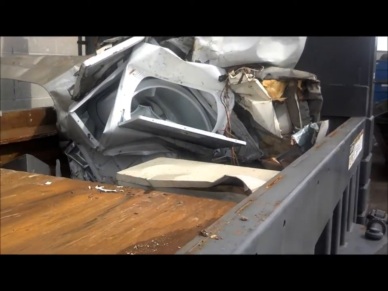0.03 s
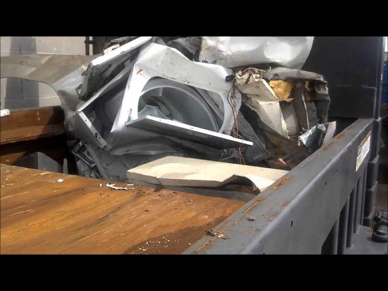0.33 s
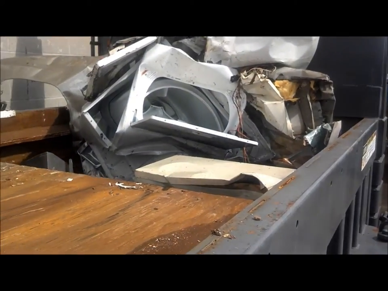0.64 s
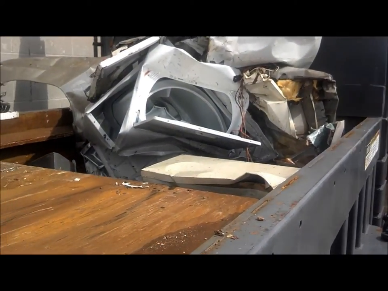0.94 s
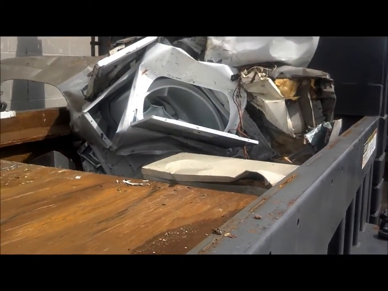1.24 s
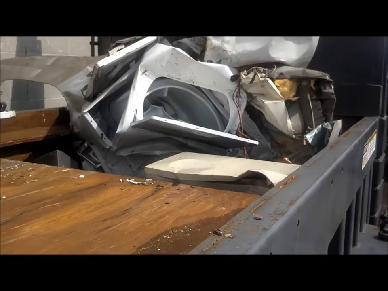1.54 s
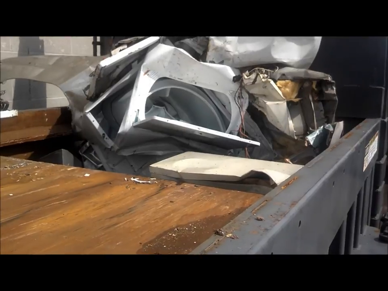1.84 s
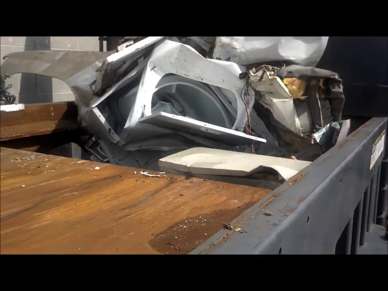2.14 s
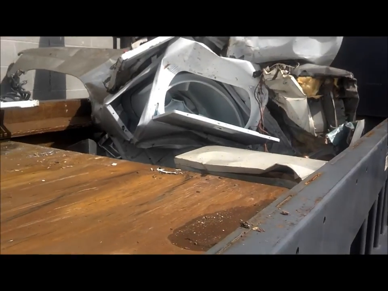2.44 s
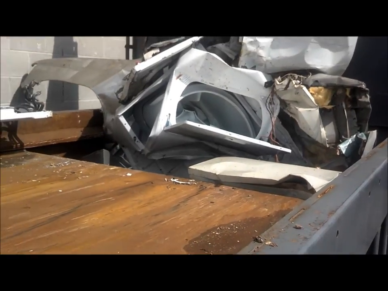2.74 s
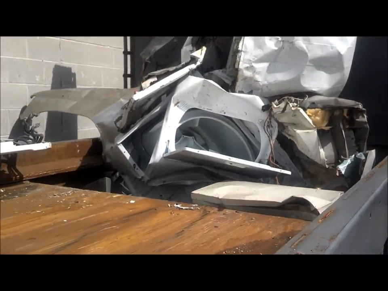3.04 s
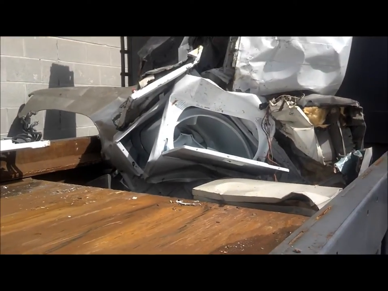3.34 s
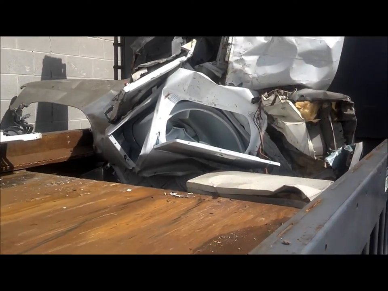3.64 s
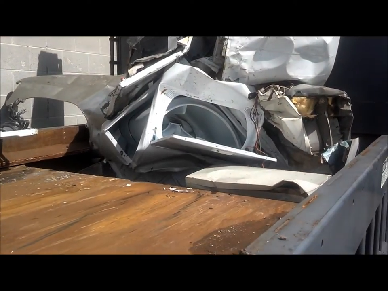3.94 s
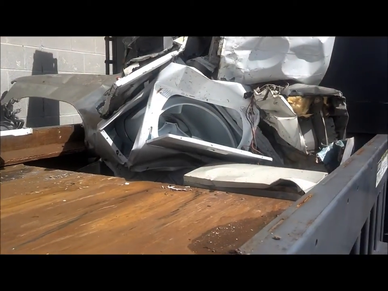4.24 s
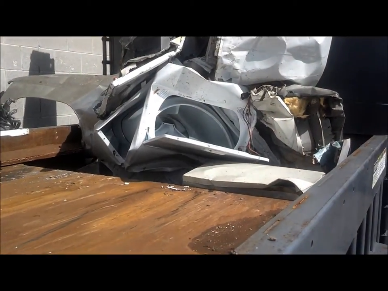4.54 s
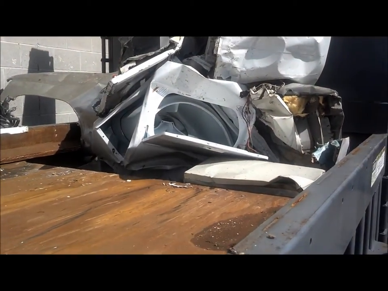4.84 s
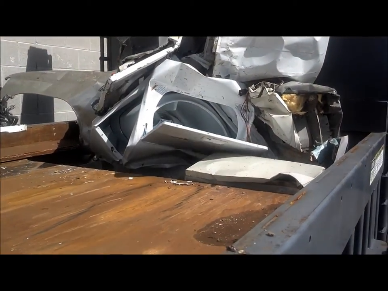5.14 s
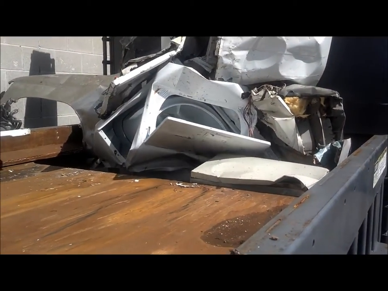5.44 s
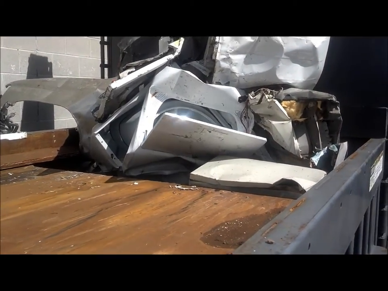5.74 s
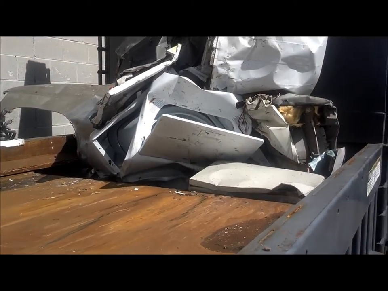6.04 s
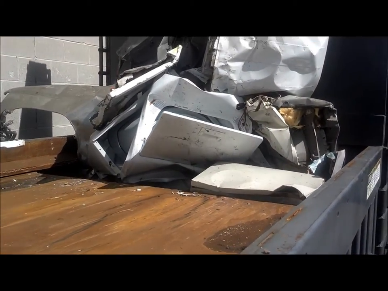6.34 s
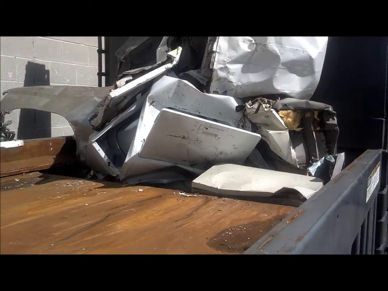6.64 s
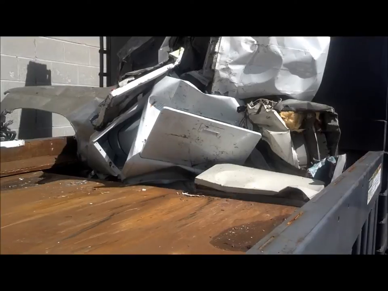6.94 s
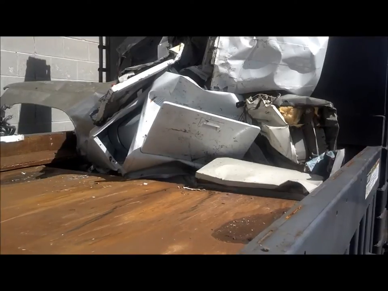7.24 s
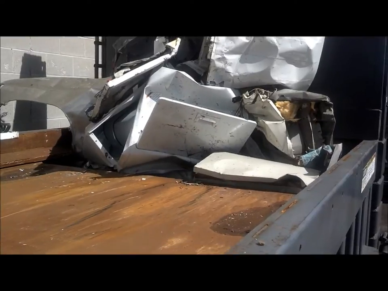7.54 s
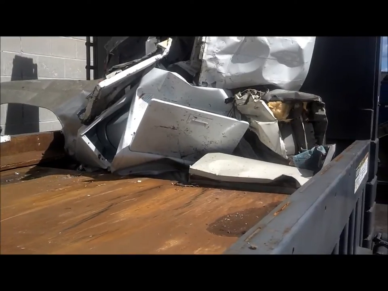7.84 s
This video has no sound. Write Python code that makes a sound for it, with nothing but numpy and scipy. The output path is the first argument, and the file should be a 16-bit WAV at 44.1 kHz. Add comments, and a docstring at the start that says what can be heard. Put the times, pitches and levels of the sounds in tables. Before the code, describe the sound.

A scrap compactor's diesel engine drones steadily, its hydraulic pump hissing and whining, as it crushes appliances in a walled yard. Metal creaks, a panel crunches, and the ram squeals along the steel floor. Crunches, sharp snaps and hollow knocks then crowd together, and a washing machine door groans as it folds. Heard from a few metres away, with short echoes.

```python
"""A hydraulic scrap compactor crushes appliances in a walled yard. From the start the diesel drones,
the pump hisses and whines, and the heap creaks. A sheet drags, a first panel crunches and snaps, and
the ram squeals along the steel floor. From 2 s panels pop with hollow knocks and the crunches crowd
in; from 5.6 s a washer's door groans as it folds. Two close microphone ports, a few metres off,
hear it all, and a limiter ducks the machine after each loud crunch."""
import sys
import numpy as np
from scipy import signal
from scipy.fft import rfft, irfft, next_fast_len
from scipy.io import wavfile
from scipy.ndimage import uniform_filter1d

SR = 44100
rng = np.random.default_rng(int(sys.argv[2]) if len(sys.argv) > 2 else 0)


def transcribe(signal):
    """Save signal, clipped to [-1, 1], as a 16-bit WAV file at the path in sys.argv[1]."""
    frames = np.atleast_2d(signal).T
    limited = np.clip(frames, -1, 1)
    pcm = np.round(limited * 32767).astype(np.int16)
    wavfile.write(sys.argv[1], SR, pcm)


N = 351918
T = np.arange(N) / SR

# Levels are relative: each voice adds its own trim.
# the shaft, slowing a touch under load: t/s, speed/(turns per s)
SHAFT_SPEED = [(0, 29.906), (2.5, 29.904), (3.2, 29.895), (6.4, 29.895), (7.98, 29.875)]
# drone and hiss levels, rising and falling over time: # t/s, drone level/dB, hiss level/dB
MACHINE_LEVELS = [(0, -25, -31.5), (0.25, -27, -30.5), (0.55, -25.5, -30), (0.61, -25, -34),
                  (1.0, -26, -29.5), (1.5, -28.5, -32), (2.6, -27, -34.5), (3.1, -25.5, -32.5),
                  (3.3, -27, -32), (3.5, -25, -31), (4.0, -30, -35), (4.5, -28.5, -33.5), (5.2, -30, -34),
                  (5.35, -31, -38.5), (6.2, -30.5, -34), (6.8, -27, -36), (7.1, -29.5, -35.5),
                  (7.7, -29, -34.5), (7.8, -37, -40.5), (7.98, -36, -36)]
# tone colour of the diesel: f/Hz, level/dB
DIESEL_SPECTRUM = [(30, -26), (70, -14), (110, -4), (170, 0), (240, 3.5), (340, 3), (450, -2), (600, 2),
                   (1020, -9.5), (1200, -6), (1450, -9.5), (1900, -11), (2600, -9), (5000, -34),
                   (16000, -17.5)]
# tone colour of rushing oil: f/Hz, level/dB
OIL_SPECTRUM = [(1000, -13), (2600, -27), (4000, 3), (5000, 6), (6300, 1), (8000, -6), (10000, 2),
                (13000, 6.5), (15500, 4.5)]
# the pump's whine: multiple of the vane rate, level/dB
PUMP_HARMONICS = [(1, -34), (2, -40), (5, -46), (8, -44), (9, -56), (10, -48), (11, -55), (12, -50),
                  (14, -59), (16, -52), (19, -59), (24, -57), (30, -50), (33, -46), (34, -48), (35, -51),
                  (36, -48.5), (37, -49), (38, -54), (39, -45), (40, -52), (41, -45.5), (42, -49),
                  (43, -52)]
# the heap's creaking bed: t/s, level/dB
CREAK_LEVELS = [(0, -32.5), (3.3, -29), (3.48, -32.5), (4.0, -36.5), (5.5, -29), (6.6, -42), (7.12, -53),
                (7.7, -29.5), (7.8, -45), (7.98, -44)]
# tone colour of crumpling sheet: f/Hz, level/dB
SCRAP_SPECTRUM = [(30, -77), (70, -27.5), (110, -12.5), (170, -2.5), (300, -5), (450, -4), (900, -1),
                  (1400, -1.5), (2000, -3), (2600, -5.5), (4000, -8), (5000, -8), (6300, -15),
                  (9000, -18.5), (15500, -9)]
# modes of the washer's casing: f/Hz, level/dB, t60/s
CASING_MODES = [(611, 4, 0.067), (889, 3, 0.17), (1144, 2.5, 0.22), (1274, 3, 0.2), (1380, 4.5, 0.17),
                (1790, 2, 0.17), (2006, 2.5, 0.13), (2402, 6.5, 0.16)]
# sheets dragging under the ram: t/s, hold/s, level/dB, bass/dB, treble/dB, gain of the casing's ring
SHEET_DRAGS = [(0.268, 0.43, -29, -12, 1, 0.9), (1.103, 0.26, -28, 9, -2, 0.23),
               (1.885, 0.48, -16.5, 3, -7.5, 0.52), (3.621, 0.26, -20, 6.5, -5, 0.28),
               (4.401, 0.38, -25.5, 6, -9, 0.16), (5.3, 0.15, -19, -8.5, -8.5, 0.43),
               (5.384, 0.11, -17, 1.5, -8, 0.23), (5.539, 0.12, -26.5, 8.5, -15, 0.54),
               (5.691, 0.1, -22, 0.5, -6, 0.48), (5.832, 0.1, -16.5, -6, -1.5, 1),
               (6.008, 0.018, -16.5, -8, -3.5, 1.4), (6.435, 0.043, -29, -2.5, -10, 0.21),
               (7.216, 0.35, -23, 0.5, -3.5, 0.42)]
# panels giving way: t/s, level/dB, bass/dB, treble/dB, collapse time/s
COLLAPSES = [(0.557, -14.5, -4, -6, 0.093), (1.582, -16.5, 4, -6.5, 0.0097), (1.638, -19, 6, -19, 0.022),
             (2.109, -17, 1, -13, 0.023), (2.315, -17, -3, -10, 0.013), (2.615, -8.5, -3, -9, 0.037),
             (3.111, -1.5, -1, -9, 0.021), (3.396, -23, -10, 6, 0.012), (3.452, -22.5, -4, -5, 0.016),
             (3.511, -21, 2, 2.5, 0.0069), (3.555, -13, -1.5, -11, 0.016), (3.575, -12, -4, -8.5, 0.022),
             (3.676, -13.5, 1, -15, 0.0074), (3.687, -5.5, -5.5, -16, 0.0036),
             (3.738, -7, -6.5, -12.5, 0.027), (3.814, -10, -7, -10.5, 0.026), (3.869, -9, 0, -5, 0.017),
             (4.064, -16.5, -1.5, -5, 0.04), (4.193, -12.5, 1, -6, 0.014), (4.301, -14, -15, -14, 0.0066),
             (4.36, -12.5, 0.5, -5.5, 0.032), (4.475, -13.5, -7, -15, 0.012),
             (4.525, -13.5, -11, -13, 0.013), (4.612, -17, 2, -9, 0.031), (4.64, -20, 8, -5, 0.021),
             (4.803, -21.5, 1, -1, 0.0098), (4.938, -23, 5.5, -3.5, 0.03), (4.962, -28, 12.5, -8, 0.034),
             (5.012, -19, 5, -11.5, 0.015), (5.127, -19, 1.5, -5.5, 0.0061), (5.149, -23.5, 1, -7, 0.0018),
             (5.258, -10.5, -2, -7, 0.0084), (5.515, -21.5, 5.5, 6, 0.0045), (5.754, -25, -14, 0.5, 0.0034),
             (5.794, -15, 0, -4.5, 0.008), (5.831, -12.5, -4.5, -4, 0.0064), (5.92, -17, -21, -1, 0.023),
             (6.056, -15, -9, 0, 0.008), (6.35, -21.5, -13, -5, 0.015), (6.486, -20, -8, -1.5, 0.0028),
             (6.553, -6.5, 1.5, -1, 0.0082), (6.666, -13.5, 2.5, 0.5, 0.02), (6.755, -17.5, -1, -6, 0.017),
             (6.822, -13, -3, -9, 0.013), (6.855, -22.5, -4, 5.5, 0.021), (6.934, -11.5, 1.5, -1.5, 0.029),
             (7.152, -12, -2, -3.5, 0.014), (7.298, -15.5, 0, -4.5, 0.013), (7.434, -17, 0, -15, 0.0062),
             (7.484, -16, 4.5, -3.5, 0.037), (7.686, -25.5, 6, 3, 0.014), (7.737, -13, -11, -6, 0.0035),
             (7.854, -24.5, -5, -18, 0.0016), (7.95, -34, -6, 0, 0.016)]
# the bright edge of cracking metal: f/Hz, level/dB
CRACK_SPECTRUM = [(1200, -37), (3500, -12), (7000, 4), (15000, -4)]
# folds cracking: t/s, level/dB, ring f/Hz, edge against click/dB
FOLD_SNAPS = [(0.585, -8, 1307, -28), (2.232, -9, 1150, -31), (2.62, 0, 1264, -31), (2.631, -3, 1280, -30),
              (3.13, -5, 1290, -33), (3.556, -7, 1180, -28), (3.742, -6, 1400, -28),
              (3.871, -5.5, 1510, -16), (4.302, -11.5, 1960, -31), (4.385, -8, 1102, -29),
              (4.477, -7.5, 1610, -33), (4.537, -10, 1300, -30), (4.65, -11, 1240, -22),
              (5.133, -15, 1314, -26), (5.26, -7.5, 725, -20), (5.806, -7.5, 1154, -26),
              (6.361, -10, 1062, -14), (6.489, -9.5, 1300, -26), (6.554, -2, 1450, -10),
              (6.559, -5, 1310, -13), (6.958, -4, 1280, -29), (6.98, -12, 1140, -28),
              (7.308, -6.5, 1530, -26), (7.442, -12, 1380, -28), (7.495, -16, 1350, -8),
              (7.75, -2.5, 1264, -28)]
# modes of a narrow strip of sheet: multiple of its pitch, level/dB
STRIP_MODES = [(0.64, -3), (1, 2), (1.19, -17), (1.47, -8), (1.73, -4), (2.9, -16)]
# steel sliding on steel: octave overtone/dB, roughness 0-1, curve of (t/s, f/Hz, level/dB)
RAM_SQUEALS = [(-28.5, 0.7, [(0.69, 997, -38), (0.75, 951, -32), (0.87, 927, -39), (0.98, 850, -39)]),
               (-18, 0.049, [(0.98, 829, -33), (1.015, 793, -22.5), (1.03, 797, -15.5), (1.05, 794, -20),
               (1.095, 792, -14), (1.134, 784, -11), (1.156, 784.5, -14), (1.25, 779, -12.5),
               (1.306, 778, -18.5), (1.366, 783.5, -12.5), (1.428, 791.6, -15), (1.458, 785.4, -13),
               (1.5, 795, -19), (1.534, 792, -13.5), (1.72, 796, -19), (1.848, 799, -19),
               (1.865, 819, -24.5)]), (-28, 0.96, [(1.865, 815, -31), (1.91, 808, -20.5),
               (1.99, 815, -28.5), (2.09, 818, -31), (2.14, 814, -24), (2.24, 826, -25.5),
               (2.28, 827, -28)]), (-26, 0.47, [(1.92, 750, -32), (2.02, 741, -27), (2.14, 737, -35),
               (2.17, 735, -38)]), (-19, 0.31, [(2.5, 796, -24.5), (2.54, 753, -29), (2.555, 745, -20),
               (2.58, 732, -15.5), (2.605, 726, -22.5), (2.66, 727, -21), (2.715, 744, -12.5),
               (2.735, 804, -24.5), (2.815, 811, -14.5), (2.83, 829, -42)]), (-21, 0.14, [(2.845, 823, -30),
               (2.862, 814, -15.5), (2.96, 814, -17.5), (3.08, 811, -14.5), (3.11, 812, -15),
               (3.16, 813, -23), (3.252, 816, -13), (3.272, 810, -39), (3.286, 817, -19), (3.354, 808, -23),
               (3.38, 820, -32)])]
# large panels popping through: t/s, f/Hz, level/dB, t60/s
PANEL_POPS = [(1.92, 135, -28, 0.42), (2.11, 522, -17, 0.17), (2.2, 276.7, -20.5, 0.3),
              (2.616, 1058, -14, 0.22), (2.655, 114.7, -23, 0.3), (2.83, 150, -28, 0.25),
              (3.682, 288, -13.5, 0.17), (3.69, 140, -20, 0.23), (3.872, 268, -11, 0.14),
              (4.204, 221, -19, 0.13), (4.389, 155, -24, 0.14), (4.635, 541, -20.5, 0.16),
              (4.645, 286.6, -24, 0.31), (4.669, 116, -23, 0.17), (4.958, 587, -19, 0.13),
              (4.993, 115, -28, 0.17), (5.046, 109.5, -29, 0.22), (5.131, 609, -13.5, 0.047),
              (5.259, 320, -12, 0.11), (5.385, 328, -18.5, 0.19), (6.361, 521, -21.5, 0.12),
              (6.68, 159.5, -19, 0.17), (6.955, 174, -17, 0.13), (7.159, 175, -26, 0.13),
              (7.497, 241.4, -20, 0.52), (7.53, 537, -20.5, 0.34), (7.648, 669, -18.5, 0.082),
              (7.747, 492, -16.5, 0.088)]
# modes of a buckled panel: multiple of its pitch, level/dB
PANEL_MODES = [(1, 7.5), (1.23, -0.5), (1.52, -8), (2.03, -4), (2.6, -7), (3.202, -17)]
# the door folding in fits: octave overtone/dB, roughness 0-1, curve of (t/s, f/Hz, level/dB)
DOOR_GROANS = [(-12, 0.48, [(5.57, 711, -27), (5.66, 719, -31), (5.72, 721, -35), (5.88, 723, -27),
               (5.96, 713, -33)]), (-4, 0.38, [(5.97, 716, -29), (6.03, 718, -30), (6.07, 714, -36),
               (6.14, 726, -27.5), (6.18, 722, -30.5), (6.23, 721, -27.5), (6.31, 708, -26.5),
               (6.35, 727, -38)]), (-11, 0.53, [(6.43, 721, -34), (6.47, 720, -28.5), (6.62, 712, -32),
               (6.78, 706, -28), (6.87, 701, -31)]), (-15, 0.34, [(6.97, 697, -27), (7.04, 701, -26.5),
               (7.16, 700, -28)]), (-16, 0.55, [(7.27, 749, -29), (7.32, 742, -29), (7.34, 742, -21.5),
               (7.385, 751, -22), (7.4, 748, -29), (7.425, 742, -24), (7.45, 800, -31), (7.5, 778, -39)])]
# the heap lies off centre, so side leads or lags mid: f/Hz, share of mid a quarter cycle ahead
SIDE_LEAD = [(400, -0.035), (750, 0.97), (1300, -0.84), (1900, -1.15), (3500, 0.33), (4700, 0.81),
             (6200, 0.027), (7500, -0.78)]
# how unlike the two ports sound: f/Hz, side gain/dB
STEREO_WIDTH = [(60, 11), (130, -1), (300, -1.5), (640, -9), (1400, 7), (2000, 0.5), (3000, -4.5),
                (16000, 6)]
# lean of the stereo image: f/Hz, left minus right/dB
STEREO_BALANCE = [(60, -3), (110, 0.5), (200, 5.5), (380, 5.5), (750, 1.5), (1290, -0.5), (2380, -0.5),
                  (4400, -1)]

VANES = 12  # pump strokes per turn of the shaft


def amp(db):
    """Decibels to gain."""
    return 10 ** (np.asarray(db) / 20)


def unit(x):
    """Scales to rms 1."""
    return x / np.sqrt(np.mean(x ** 2) + 1e-20)


def read(points, hz):
    """Reads a spectrum on a log-frequency axis."""
    f, value = np.transpose(points)
    return np.interp(np.log(abs(hz) + 1), np.log(f + 1), value)


def follow(rows, t):
    """Reads every column of a curve at the times t."""
    times, *columns = np.transpose(rows)
    return [np.interp(t, times, column) for column in columns]


def add(mix, start, sound):
    """Lays a sound into the mix at start seconds."""
    part = mix[:, max(round(start * SR), 0):][:, :sound.shape[1]]
    part += sound[:, :part.shape[1]]


def wander(size, hz):
    """Smooth random motion of rms about 1, rolling off above hz."""
    n = next_fast_len(size + SR // 4)
    f = np.fft.rfftfreq(n, 1 / SR)
    return unit(irfft(rfft(rng.standard_normal(n)) * np.exp(-(f / hz) ** 2), n))[:size]


def tint(x, points, size=2048):
    """Minimum-phase EQ with the given spectrum."""
    log_gain = np.log(amp(read(points, np.fft.fftfreq(size, 1 / SR))))
    taps = np.fft.ifft(np.exp(np.conj(signal.hilbert(log_gain)))).real
    return signal.oaconvolve(x, taps[None], axes=1)[:, :x.shape[1]]


def colour(x, bass_db, treble_db):
    """Bass and treble EQ: large panels sound deep, sharp folds bright."""
    return tint(x, [(45, 0), (100, bass_db), (450, bass_db), (950, 0), (2300, 0),
                    (3400, treble_db), (8000, treble_db), (12000, treble_db - 4)])


def crackle(size, per_s, spread_db, rub):
    """Tiny ticks of unequal size over a smooth rubbing noise, as mid and side."""
    hits = rng.random(size) < per_s / SR
    strength = amp(spread_db * np.minimum(rng.exponential(1, size), 3))
    ticks = unit(hits * strength * rng.uniform(-0.81, 1, (2, size)))
    return unit(ticks + rub * rng.standard_normal((2, size)))


def diesel(turns, drone_db, throb=0.052, flutter_db=0.95, trim_db=-0.38):
    """The diesel's drone swells with each firing, two to a turn."""
    firing = 1 + throb * np.cos(4 * np.pi * turns)
    drone = unit(tint(rng.standard_normal((2, N)) * firing, DIESEL_SPECTRUM))
    return drone * amp(drone_db + trim_db + flutter_db * wander(N, 32))


def oil_hiss(turns, hiss_db, vane_depth=0.13, shaft_depth=0.42, trim_db=-3.5):
    """Oil hisses through the pump in spurts, one a vane, unevenly round the shaft."""
    spurts = 1 + vane_depth * np.cos(2 * np.pi * VANES * turns)
    spurts *= 1 + shaft_depth * np.cos(2 * np.pi * turns)
    fizz = crackle(N, per_s=3800, spread_db=7.0, rub=2.9)
    return unit(tint(fizz * spurts, OIL_SPECTRUM)) * amp(hiss_db + trim_db)


def pump_whine(turns, drone_db, hiss_db, waver=0.41, waver_hz=9, hop=200):
    """Pressure ripple sings at multiples of the vane rate; low tones ride the drone, high the hiss."""
    whine = np.zeros((2, N))
    grid = np.arange(0, N, hop)
    for harmonic, db in PUMP_HARMONICS:
        # each tone arrives by many paths, so it fades in and out
        paths = rng.standard_normal((2, len(grid))) + 1j * rng.standard_normal((2, len(grid)))
        paths = signal.lfilter(*signal.butter(2, waver_hz, fs=SR / hop), paths)
        paths = np.array([[1], [1j]]) + waver * paths / paths.std()
        fading = np.array([np.interp(np.arange(N), grid, path) for path in paths])
        tone = np.exp(2j * np.pi * (harmonic * VANES * turns + rng.random()))
        level = amp(db + (drone_db + 24 if harmonic < 6 else hiss_db + 32))
        whine += np.sqrt(2) * level * (fading * tone).real
    return whine


def ringing(x, modes):
    """The ring of metal modes struck by x, as loud as x."""
    t = np.arange(SR // 5) / SR
    ring = sum(amp(db - 60 * t / t60) * np.sin(2 * np.pi * hz * t) for hz, db, t60 in modes)
    return x.std() * unit(signal.oaconvolve(x, ring[None], axes=1)[:, :x.shape[1]])


def bend(x, rise_per_s, waver=0.0081, waver_hz=7):
    """A sheet's ring wavers in pitch, and climbs with strain by the share rise_per_s."""
    n = np.arange(x.shape[1])
    speed = 1 + rise_per_s * n / SR + waver * wander(len(n), waver_hz)
    place = np.cumsum(speed) % len(n)
    return np.array([np.interp(place, n, channel) for channel in x])


def grind(size, db, bass_db, treble_db, casing, rise_per_s, lurch_db=1.33, trim_db=-1.5):
    """The heap crumples in small lurches, and the straining casing sings along."""
    ticks = crackle(size, per_s=1700, spread_db=1.5, rub=1.0)
    body = tint(ticks * amp(lurch_db * wander(size, 45)), SCRAP_SPECTRUM)
    ring = bend(ringing(body, CASING_MODES), rise_per_s)
    return amp(db + trim_db) * colour(unit(body + casing * ring), bass_db, treble_db)


def scrape(hold_s, db, bass_db, treble_db, casing, rise_s=0.0078, t60=0.27):
    """A sheet catches, grinds under the ram, and lets go."""
    t = np.arange(0, hold_s + t60, 1 / SR)
    envelope = np.minimum(t / rise_s, 1) * amp(-60 * np.maximum(t - hold_s, 0) / t60)
    return envelope * grind(SR, db, bass_db, treble_db, casing, rise_per_s=0.06)[:, :len(t)]


def jolts(t, per_s=70, fade_s=0.01, steady=0.87):
    """The uneven jolts of a collapse, each sudden and quickly fading."""
    hits = rng.random(len(t)) < per_s / SR
    since_hit = t - np.maximum.accumulate(t * hits)
    return unit(steady + np.exp(-since_hit / fade_s))


def fold_ring(x, ring=0.44, casing=0.053, t60=0.15, low_hz=401.6, high_hz=2200):
    """Each fold rings briefly with a dozen modes of its own, and shakes the whole casing."""
    modes = [(hz, 0, t60) for hz in low_hz * (high_hz / low_hz) ** rng.random(12)]
    return x + ring * ringing(x, modes) + casing * ringing(x, CASING_MODES)


def crunch(db, bass_db, treble_db, collapse_s, t60=0.16, click_s=0.0023, crack_s=0.027, trim_db=-0.66):
    """A panel gives with a bright crack, then collapses in a burst of crackle that dies away."""
    t = np.arange(SR // 3) / SR
    attack = np.minimum(t / (0.35 * collapse_s), 1)
    settle = amp(-60 * np.maximum(t - collapse_s, 0) / t60)
    burst = attack * settle * jolts(t) + 0.57 * np.exp(-t / click_s)
    ticks = crackle(len(t), per_s=2500, spread_db=2.5, rub=0.97)
    body = fold_ring(tint(ticks * burst, SCRAP_SPECTRUM))
    body = unit(body) * np.sqrt(np.mean(burst ** 2))
    crack = amp(-14) * bright_edge(t, crack_s)
    return colour((body + crack) * amp(db + trim_db), bass_db, treble_db)


def bright_edge(t, fade_s):
    """The splash of treble as metal cracks."""
    return unit(tint(rng.standard_normal((2, len(t))), CRACK_SPECTRUM)) * np.exp(-t / fade_s)


def snap(db, hz, edge_db, click_s=0.0021, ring_db=-7, t60=0.1, detune=0.057):
    """A fold cracks all at once: a hard click, a bright edge, and the short ring of the freed strip."""
    t = np.arange(SR // 5) / SR
    click = tint(rng.standard_normal((2, len(t))) * np.exp(-t / click_s), SCRAP_SPECTRUM)
    click = colour(click, bass_db=-2, treble_db=-5)
    edge = amp(edge_db) * bright_edge(t, fade_s=0.008)
    ring = np.zeros((2, len(t)))
    for ratio, mode_db in STRIP_MODES:
        mode_hz = hz * ratio ** (1 + detune * rng.standard_normal())
        ring += amp(mode_db) * np.sin(2 * np.pi * (mode_hz * t + rng.random((2, 1))))
    ring = unit(ring) * amp(ring_db - 60 * t / t60) / 2
    return amp(db) * (click / abs(click).max() + edge + ring)


def squeal(octave_db, rough, curve, jitter_hz=2, chatter_hz=48, rasp_db=-37, shake_db=0.5, trim_db=-0.3):
    """Stick and slip lock into a tone whose overtones grow with force; a poor grip makes it chatter."""
    t = np.arange(curve[0][0], curve[-1][0], 1 / SR)
    hz, db = follow(curve, t)
    jitter = jitter_hz * (1 + rough) * wander(len(t), 120)
    chatter = (wander(len(t), chatter_hz) + 1j * wander(len(t), chatter_hz)) / np.sqrt(2)
    grip = np.sqrt(1 - rough ** 2) + rough * chatter
    phase = 2 * np.pi * np.cumsum(hz + jitter) / SR + np.angle(grip)
    rasp = sum(np.sin(k * phase) for k in range(3, 7))
    overtones = amp(octave_db) * np.sin(2 * phase) + amp(rasp_db) * rasp
    bite = amp(0.33 * (db - db.max()))
    tone = np.sqrt(2) * abs(grip) * (np.sin(phase) + bite * overtones)
    fade = np.clip(np.minimum(t - t[0], t[-1] - t) / 0.0026, 0, 1)
    tone *= fade * amp(db + trim_db + shake_db * wander(len(t), 48))
    return np.array([tone, tone])


def knock(hz, db, t60, rise_s=0.0039, sag=0.091, sag_s=0.02, detune=0.0334, rattle_db=3, side=0.68):
    """A panel pops through: its modes start taut, sag to pitch and rattle on the heap as they die."""
    t = np.arange(0, t60, 1 / SR)
    cycles = hz * (t + sag * sag_s * (1 - np.exp(-t / sag_s)))
    body = np.zeros((2, len(t)))
    for ratio, mode_db in PANEL_MODES:
        level = amp(mode_db + rattle_db * wander(len(t), 0.21 * hz))
        detuned = ratio * (1 + detune * rng.uniform(-1.1, 1))
        body += level * np.sin(2 * np.pi * (detuned * cycles + rng.random((2, 1))))
    envelope = np.minimum(t / rise_s, 1) * amp(db - 60 * t / t60)
    return unit(body) * np.array([[1], [side]]) * envelope


def yard(x, t60=0.27, wet_db=-13, echoes=300):
    """Scattered echoes from the steel box and the yard wall."""
    taps = np.zeros((2, SR // 3))
    delays = rng.integers(SR // 200, SR // 3, (2, echoes))
    gains = rng.choice([-1, 1], delays.shape) * amp(-60 * delays / SR / t60)
    np.put_along_axis(taps, delays, gains, axis=1)
    return x + amp(wet_db) * signal.oaconvolve(x, taps / np.linalg.norm(taps[0]), axes=1)[:, :N]


def ports(mid_side, lag_samples=16, comb_depth=1.25):
    """Two close ports, widened to left and right: the delay between them combs mid and side in turn."""
    size = next_fast_len(N + SR // 4)
    hz = np.fft.rfftfreq(size, 1 / SR)
    mid, side = rfft(mid_side, size)
    lead = np.clip(read(SIDE_LEAD, hz), -1, 1)
    side = 1j * lead * mid + np.sqrt(1 - lead ** 2) * side
    angle = np.pi * hz * lag_samples / SR
    mid_gain = np.where(angle < np.pi / 2, 1, abs(np.sin(angle)) ** comb_depth)  # no comb in the lows
    side_gain = abs(np.cos(angle)) ** comb_depth * amp(read(STEREO_WIDTH, hz))
    mid, side = mid * mid_gain, side * side_gain
    pair = np.array([mid + side, mid - side]) / np.hypot(mid_gain, side_gain)
    lean = amp(np.array([[.5], [-.5]]) * read(STEREO_BALANCE, hz))
    lean /= np.sqrt(np.mean(lean ** 2, axis=0))
    return irfft(pair * lean, size)[:, :N]


def limiter(x, threshold_db=-14.5, ratio=6, attack_s=0.0031, recover_db_per_s=9.0, bright_db=4):
    """Ducks everything at each loud peak, more so at bright ones, and slowly lets it back up."""
    sidechain = tint(x, [(900, 0.016), (1800, bright_db)])
    power = abs(uniform_filter1d((sidechain ** 2).mean(0), size=200))
    excess_db = np.maximum(10 * np.log10(power + 1e-12) - threshold_db, 0) * (1 - 1 / ratio)
    recovery = recover_db_per_s * T
    duck_db = np.maximum.accumulate(excess_db + recovery) - recovery
    pole = np.exp(-1 / (attack_s * SR))
    return x * amp(-signal.lfilter([1 - pole], [1, -pole], duck_db))


def scene():
    """The running machine and the echoing scrap, as mid and side."""
    turns = np.cumsum(follow(SHAFT_SPEED, T)[0]) / SR
    drone_db, hiss_db = follow(MACHINE_LEVELS, T)
    machine = diesel(turns, drone_db) + oil_hiss(turns, hiss_db) + pump_whine(turns, drone_db, hiss_db)
    creak_db = follow(CREAK_LEVELS, T)[0]
    scrap = grind(N, creak_db, bass_db=1, treble_db=-1.5, casing=0.34, rise_per_s=0)
    for voice, cues in (scrape, SHEET_DRAGS), (crunch, COLLAPSES), (knock, PANEL_POPS), (snap, FOLD_SNAPS):
        for start, *settings in cues:
            add(scrap, start, voice(*settings))
    for octave_db, rough, curve in RAM_SQUEALS + DOOR_GROANS:
        add(scrap, curve[0][0], squeal(octave_db, rough, curve))
    return yard(scrap) + machine


def record(dry, ceiling=0.9, cutoff_hz=15780):
    """The microphone chain: stereo ports, limiter, soft overload and a steep top cut."""
    ducked = limiter(ports(dry))
    rounded = ducked / (1 + (ducked / ceiling) ** 4) ** (1 / 4)
    lowpass = signal.firwin(1023, cutoff_hz, window=("kaiser", 8), fs=SR)
    return signal.oaconvolve(rounded, lowpass[None], "same")


dry = scene()
out = record(dry)
transcribe(out)
```